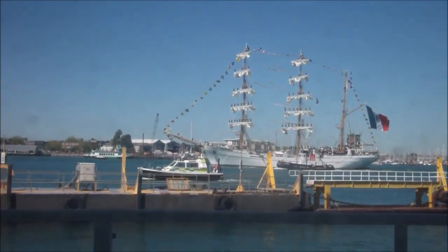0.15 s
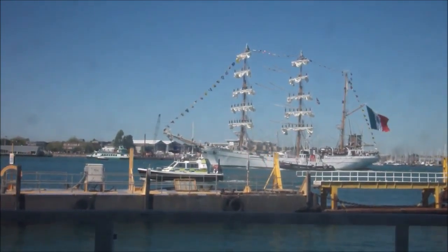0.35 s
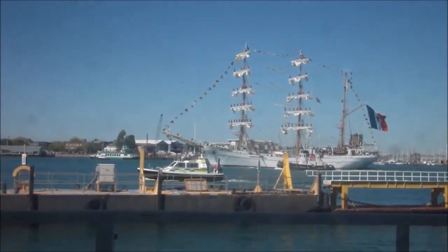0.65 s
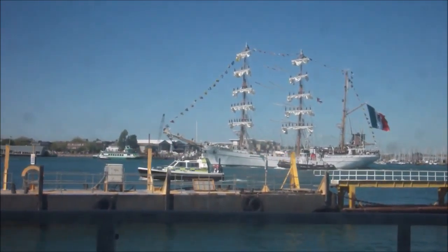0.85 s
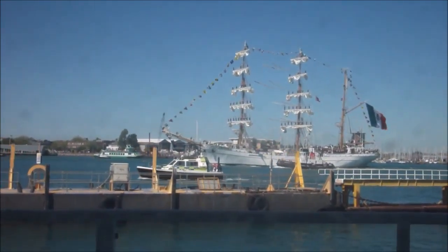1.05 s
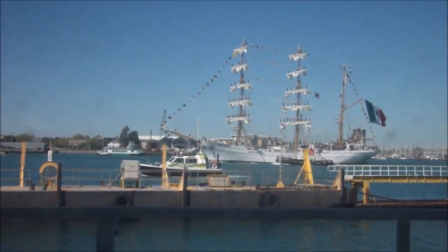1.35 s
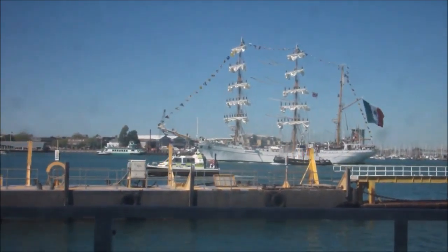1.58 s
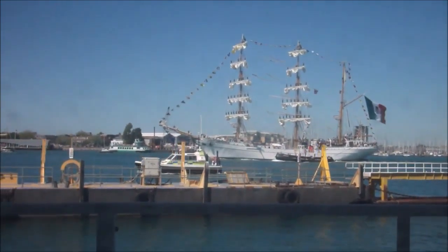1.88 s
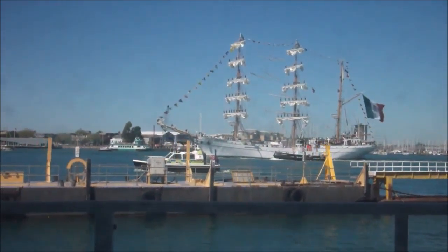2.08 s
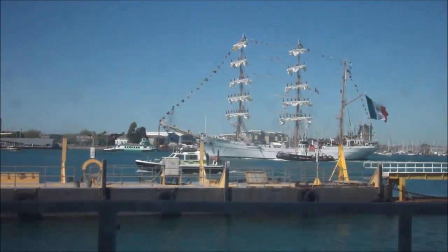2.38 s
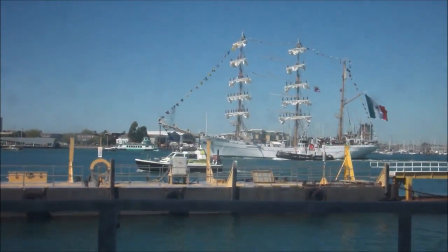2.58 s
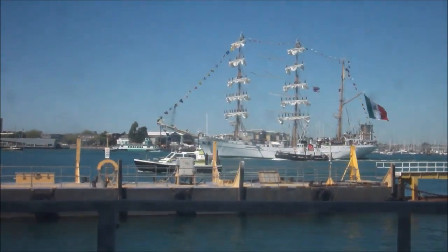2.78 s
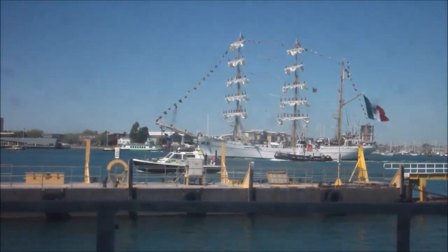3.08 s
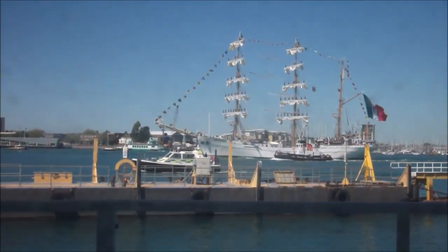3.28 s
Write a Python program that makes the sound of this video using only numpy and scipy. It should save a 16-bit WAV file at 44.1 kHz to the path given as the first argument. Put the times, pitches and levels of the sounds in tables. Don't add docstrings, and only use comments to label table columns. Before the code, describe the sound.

Low boat engine rumble, gradually growing stronger, with soft wash, faint hiss and small swell slaps.

```python
import sys
import numpy as np
from scipy import signal
from scipy.fft import rfft, irfft, next_fast_len
from scipy.io import wavfile
from scipy.ndimage import uniform_filter1d, map_coordinates

SR = 44100
rng = np.random.default_rng(int(sys.argv[2]) if len(sys.argv) > 2 else 0)


def store_wav(level_fs):
    pcm = np.round(np.clip(np.atleast_2d(level_fs), -1, 1) * 32767)
    wavfile.write(sys.argv[1], SR, pcm.T.astype(np.int16))


def how_loud(loudness_db):
    steps = np.asarray(loudness_db, float) / 20
    return 10 ** steps


N = 151263


def unit(x):
    return x / np.sqrt(np.mean(x ** 2) + 1e-20)


def curves(rows):
    s, *cols = np.transpose(rows)
    return [np.interp(np.arange(N) / SR, s, c) for c in cols]


def wobble(rate):
    return map_coordinates(rng.standard_normal(64), [np.arange(N) * rate / SR], mode="wrap")


def turns(hz):
    return 2 * np.pi * np.cumsum(np.broadcast_to(hz, N)) / SR


def tone(phase, db, sway_db, rate):
    level = np.sqrt(2) * how_loud(db + sway_db * wobble(rate))
    start = 2 * np.pi * rng.random()
    drift = sway_db / 10 * wobble(rate)
    return level * np.sin(phase + start + drift)


def rush(points, patchy_db):
    z = signal.stft(rng.standard_normal(N + 8192), nperseg=512)[2]
    patches = uniform_filter1d(rng.standard_normal(z.shape), size=5, axis=0)
    patches = uniform_filter1d(patches, size=12, axis=1)
    x = signal.istft(z * how_loud(patchy_db * unit(patches)), nperseg=512)[1]
    f, db = np.transpose(points)
    m = next_fast_len(len(x))
    pitch = np.log(np.fft.rfftfreq(m, 1 / SR) + 1)
    gain = how_loud(np.interp(pitch, np.log(f + 1), db, left=-60, right=-120))
    return unit(irfft(rfft(x, m) * gain, m)[:N])


CYLINDERS = 6
# t/s, f/Hz, level/dB
FIRING_CURVE = [(0, 63.2, -19.5), (.13, 63.5, -23), (.2, 63.53, -17.5), (.5, 64.87, -19.5),
                (.74, 66.7, -20.5), (.92, 67.37, -20.5), (1.15, 68.35, -21.5), (1.35, 68.85, -20.5),
                (1.5, 68.8, -22.5), (1.75, 68.6, -19), (1.95, 68.85, -20.5), (2.2, 69.03, -17),
                (2.4, 68.97, -19), (2.62, 69.37, -13.5), (2.75, 69.03, -26), (2.97, 69.7, -12.5),
                (3.1, 68.65, -16.5), (3.43, 69.8, -14)]
# t/s, level/dB
UNEVENNESS = [(0, -23), (.1, -25), (.3, -18), (.42, -27), (.6, -28), (.95, -22.5), (1.18, -18.5),
              (1.33, -26), (1.47, -17.5), (1.65, -23.5), (1.78, -16), (1.95, -21), (2.13, -16.5),
              (2.3, -21), (2.52, -16.5), (2.62, -25.5), (2.8, -19), (3.43, -21)]
SHAFT_MULTIPLES = [2, 3, 4, 5, 7, 8, 9]
# level/dB, growth/(dB/s)
MULTIPLE_LEVELS = [(-9, 3.5), (0, 0), (-18, 4), (-9, 1), (-17, -1), (-14, 0), (-17, 0)]
# f/Hz, level/dB, growth/(dB/s)
MACHINE_HUMS = [(35.5, -42, -8), (50.5, -33, -2), (86, -34, 1), (101, -34, 1), (148, -36, 0), (190, -38, 0),
                (252, -40, 2), (587, -50, -1), (410, -49, -1)]


def diesel():
    rate, level_db = curves(FIRING_CURVE)
    shaft = turns(rate / CYLINDERS)
    uneven_db, = curves(UNEVENNESS)
    t = np.arange(N) / SR - N / SR / 2
    out = tone(CYLINDERS * shaft, level_db, sway_db=1.3, rate=15)
    for k, (db, grows) in zip(SHAFT_MULTIPLES, MULTIPLE_LEVELS):
        out = out + tone(k * shaft, uneven_db + db + grows * t, sway_db=1.8, rate=11)
    for hz, db, grows in MACHINE_HUMS:
        out = out + tone(turns(hz), db + grows * t, sway_db=3, rate=10.5)
    return out


# t/s, level/dB
WASH_CURVE = [(0, -23), (.3, -23), (.6, -21), (.85, -21.5), (1.03, -21), (1.15, -23), (1.3, -21),
              (1.5, -22), (1.75, -20), (2, -20.5), (2.2, -21.5), (2.45, -21.5), (2.7, -20.5), (2.9, -19.5),
              (3.15, -20.5), (3.43, -20)]
# f/Hz, level/dB (per Hz)
RUMBLE_COLOUR = [(14, -29), (20, -2.5), (40, -3), (90, -3.5), (160, -8), (300, -18.5), (700, -29),
                 (1200, -35)]
# f/Hz, level/dB (per Hz)
HISS_COLOUR = [(700, -1), (1300, -10.5), (2000, -14), (3500, -19.5), (5500, -25), (7300, -24.5),
               (8500, -28.5), (15000, -31)]


def wash():
    level_db, = curves(WASH_CURVE)
    shaft = turns(curves(FIRING_CURVE)[0] / CYLINDERS)
    chug_db = 0.9 * np.sin(shaft + 1.9 * wobble(3.38))
    lumps_db = 0.37 * wobble(3.57) + 0.3 * wobble(8.1)
    rumble = how_loud(level_db + lumps_db + chug_db) * rush(RUMBLE_COLOUR + [(2500, -60.0)], patchy_db=0.34)
    hiss_db = -43.5 + 0.47 * (level_db - level_db.mean()) + 0.16 * wobble(6.06)
    hiss = how_loud(hiss_db) * rush([(300, -34)] + HISS_COLOUR + [(16000, -41)], patchy_db=0.4)
    return deck(rumble + hiss * (1 + 0.05 * np.sin(shaft)))


# f/Hz, width/Hz, level/dB
DECK_BANDS = [(68.5, 10, -1.5), (99, 11, -1.5), (323, 48, 0.5), (432, 22, 2), (593, 183, 2), (788, 49, -2),
              (1160, 89, 2.5), (1940, 180, 2.5), (2600, 220, -1), (3350, 300, 1.5)]


def deck(x):
    f = np.fft.rfftfreq(N, 1 / SR)
    gain_db = sum(db * np.exp(-((f - hz) / width) ** 2) for hz, width, db in DECK_BANDS)
    return irfft(rfft(x) * how_loud(gain_db), N)


# t/s, length/s, f/Hz, level/dB (peak)
THUDS = [(.3, .05, 162, -25), (.61, .03, 228, -23), (.85, 0.039, 250, -25.5), (1.38, .04, 192, -24),
         (1.45, 0.025, 145, -22.5), (1.79, 0.048, 33, -12.5), (1.78, 0.031, 257.9, -22.5),
         (1.96, .06, 148, -22), (2.12, 0.057, 252.3, -25.5), (2.282, .04, 268.4, -25.5),
         (2.601, 0.024, 150.1, -18), (2.66, .05, 263, -24), (2.85, .06, 145.3, -21),
         (3.43, .016, 69.98, -3.5)]


def thuds():
    t = np.arange(N) / SR
    out = np.zeros(N)
    for s, length, hz, db in THUDS:
        swell = np.exp(-(2 * (t - s) / length) ** 2)
        out = out + how_loud(db) * swell * np.cos(2 * np.pi * hz * (t - s))
    return out


# t/s, level/dB
GENERATOR_CURVE = [(0, -52), (.9, -54), (1.5, -49.5), (2.4, -46.5), (3.43, -50.5)]
# multiple, level/dB
BUZZ_MULTIPLES = [(3, 2), (4, -1), (5, -1), (6, -3), (7, -6), (9, -14), (10, -14), (11, -17), (12, -14.5),
                  (13, -14), (15, -20), (17, -20), (18, -25), (19, -26), (20, -20)]


def generator():
    level_db, = curves(GENERATOR_CURVE)
    phase = turns(142.2 * (1 + 0.001276 * wobble(2.532)))
    return sum(tone(k * phase, level_db + db, sway_db=3, rate=8) for k, db in BUZZ_MULTIPLES)


# t/s, length/s, f/Hz, level/dB
PEEPS = [
    (.05, .07, 4100, -56),
    (.105, .04, 4050, -60),
    (.165, .025, 3000, -55),
    (.962, .03, 3650, -53),
    (.998, .035, 3680, -54),
    (.966, .025, 1800, -49),
]


def chirps():
    t = np.arange(N) / SR
    flutter = 0.9 * np.sin(turns(120))
    out = np.zeros(N)
    for s, length, hz, db in PEEPS:
        place = (t - s) / length
        bend = 0.021 * np.cos(np.pi * np.clip(place, -1, 1))
        out = out + how_loud(db) * np.exp(-(2 * place) ** 4) * np.sin(turns(hz * (1 + bend)) + flutter)
    return out


# t/s, phase slip at each control tick/cycles
DRUM_SLIP = [(0, .4), (1.55, .4), (1.66, .31), (1.97, .31), (2.33, .1), (2.56, .1), (2.64, 0), (3.43, 0)]


def tape_motors():
    slip, = curves(DRUM_SLIP)
    drum = whine(7441.45, tick_hz=29.55, slip=slip, db=-59, octave_db=-65)
    capstan = whine(7170.4, tick_hz=54.33, slip=.495, db=-62.5, octave_db=-86)
    return drum + capstan


def whine(hz, tick_hz, slip, db, octave_db):
    ticks = np.diff(np.floor(np.arange(N + 1) * tick_hz / SR + rng.random()))
    phase = turns(hz) + 2 * np.pi * np.cumsum(ticks * slip)
    return tone(phase, db, sway_db=.4, rate=9) + tone(2 * phase, octave_db, sway_db=.6, rate=9)


def scene():
    return (diesel() + wash() + thuds() + generator() + chirps() + tape_motors())[None]


def top_cut(x):
    return signal.sosfilt(signal.butter(12, 15735, fs=SR, output="sos"), x)


def record(dry):
    mix = dry + .0087
    return top_cut(mix)


dry = scene()
out = record(dry)
store_wav(out)
```